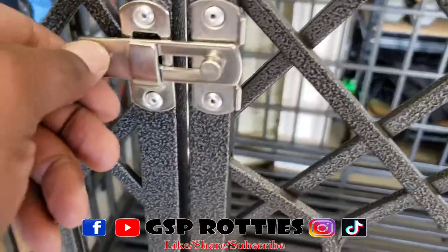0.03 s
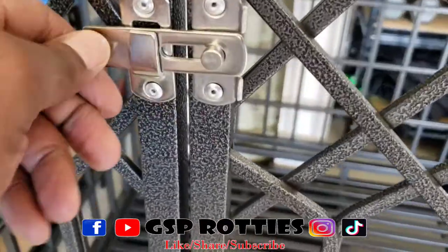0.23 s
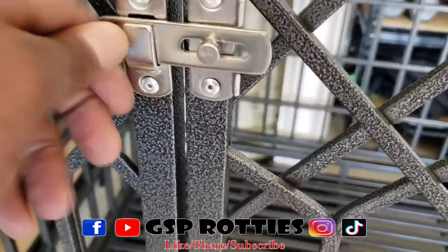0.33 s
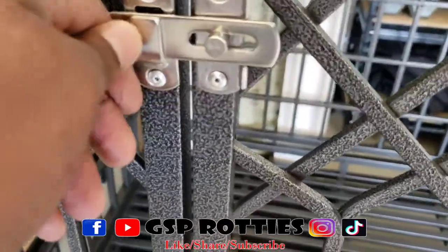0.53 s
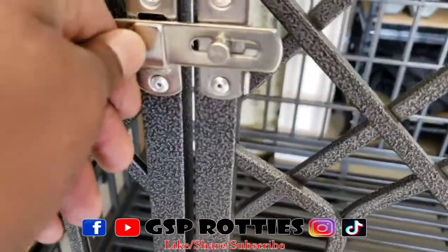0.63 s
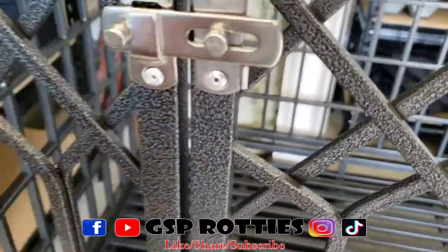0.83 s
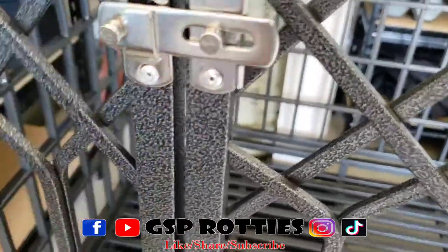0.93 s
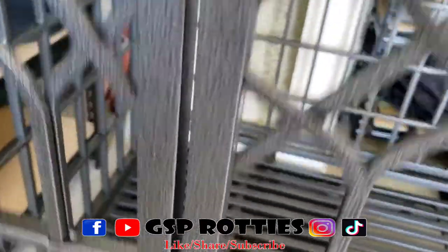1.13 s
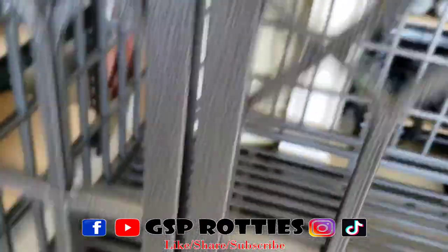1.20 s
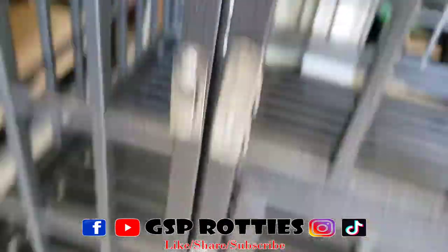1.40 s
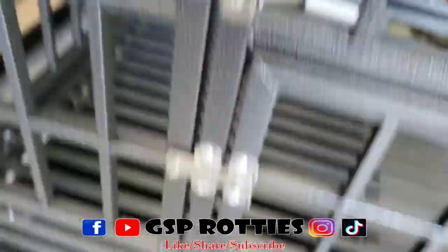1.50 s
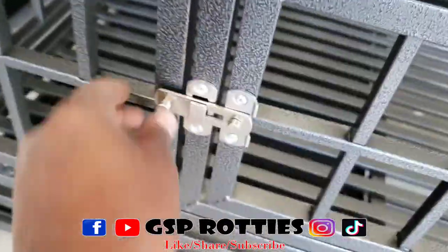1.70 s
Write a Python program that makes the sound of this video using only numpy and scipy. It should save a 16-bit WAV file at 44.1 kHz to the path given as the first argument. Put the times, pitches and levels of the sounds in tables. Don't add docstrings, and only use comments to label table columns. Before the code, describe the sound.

Close metallic clicks and a sharp clack of a steel bolt, then faint rattles of a cage door.

```python
import sys
import numpy as np
from scipy import signal
from scipy.fft import rfft, irfft, next_fast_len
from scipy.io import wavfile
from scipy.ndimage import uniform_filter1d, map_coordinates

SR = 44100
rng = np.random.default_rng(int(sys.argv[2]) if len(sys.argv) > 2 else 0)


def pcm_store(signal):
    levels = np.round(np.clip(np.atleast_2d(signal), -1, 1) * 32767)
    wavfile.write(sys.argv[1], SR, levels.astype(np.int16).T)


def rack_gain(trim_db):
    fader = np.asarray(trim_db, float)
    return 10 ** (fader / 20)


N = 77175

# f/Hz, t60/s
STEEL_T60 = [(200, 0.51), (600, 0.32), (1500, 0.17), (3000, 0.34), (5500, 0.13), (8500, 0.17), (12000, .08),
             (15500, 0.25)]
# f/Hz, likeness/-1..1
STEEL_ALIKE = [(300, 0.7), (700, 0.5), (1400, -0.7), (3000, -0), (7000, 0.2)]
# f/Hz, level/dB
PORTS = [(200, 0), (700, -0.85), (1300, -5), (4500, -1), (8000, 1), (12000, 3.5), (14700, 5.5)]
# f/Hz, level/dB
GARAGE_PORTS = [(200, -1.5), (700, 0.5), (2400, -5), (4400, -2), (8000, 2), (12000, -0.5), (15000, -0.5)]
# f/Hz, likeness/-1..1
AIR_ALIKE = [(60, 0.8), (180, 0.75), (550, 0.58), (1650, 0.053), (4970, -0.21), (15000, -0.4)]
FAR_PAN_DB = -2
LOW_CUT_HZ = 240


def unit(x):
    return x / np.sqrt(np.mean(x ** 2) + 1e-20)


def along(points, hz):
    f, v = np.transpose(points)
    return np.interp(np.log(hz + 1), np.log(f + 1), v)


def curve(rows):
    return np.interp(np.arange(N) / SR, *np.transpose(rows))


def filtered(x, response):
    m = next_fast_len(x.shape[-1] + 8192)
    spectrum = rfft(x, m) * response(np.fft.rfftfreq(m, 1 / SR))
    return irfft(spectrum, m)[..., :x.shape[-1]]


def sides(db):
    return rack_gain(np.array([db / 2, -db / 2]))


def wobble(rate):
    knots = rng.standard_normal(int(N * rate / SR) + 4)
    return map_coordinates(knots, [np.arange(N) * rate / SR])


def rush(spectrum, alike, ports):
    def mid_side(hz):
        turn = np.arccos(np.clip(along(alike, hz), -1, 1)) / 2
        return rack_gain(along(spectrum, hz)) * [np.cos(turn), np.sin(turn)]

    mid, side = filtered(rng.standard_normal((2, N)), mid_side)
    left_right = np.array([mid + side, mid - side])
    return unit(filtered(left_right, lambda hz: sides(along(ports, hz))))


def background():
    # f/Hz, level/dB
    air_spectrum = [(150, -27), (220, -4.5), (600, -8.5), (750, -3), (1100, -15), (4300, -16), (8600, -22),
                    (14000, -22)]
    # f/Hz, level/dB
    rumble_spectrum = [(12, -44), (20, -17.5), (77, -2.5), (93, -3), (108, -13.5), (250, -31.5),
                       (320, -59.5), (550, -120)]
    # f/Hz, level/dB
    air_ports = [(60, -1), (240, -0.9), (950, -0.5), (3770, -6), (15000, 4)]
    # t/s, level/dB
    grip = [(0.0, -50), (0.034, -63), (0.072, -69), (0.262, -57), (0.36, -67.5), (0.428, -58.5),
            (0.526, -69.5), (0.574, -61.5), (0.744, -74), (0.814, -62.5), (0.852, -70), (1.168, -66),
            (1.252, -73), (1.344, -63.5), (1.374, -73), (1.5, -61), (1.524, -66), (1.75, -66)]
    # t/s, level/dB
    shake = [(0, -3), (.6, 0.5), (.75, -14), (1.75, -23)]
    upper_spectrum = [(80, -26.0), (140, -2.0), (260, -21.5), (500, -62.5)]  # f/Hz, level/dB
    rumble = rush(rumble_spectrum, [(50, .8)], air_ports)
    rumble += rack_gain(curve(shake)) * rush(upper_spectrum, [(50, 0.99)], air_ports)
    held = rack_gain(curve(grip) + 0.53 * wobble(7.3)) * rumble
    air = rack_gain(-75 + 0.58 * wobble(4)) * rush(air_spectrum, AIR_ALIKE, air_ports)
    return held + air


def shelves(hz, treble_db, bass_db):
    treble_hz, bass_hz = 8600, 1940
    treble = treble_db / (1 + (treble_hz / (hz + 1)) ** 4)
    bass = bass_db / (1 + (hz / bass_hz) ** 4)
    return rack_gain(treble + bass)


def contacts(blows, slides):
    count, soft_s = 10, .004
    grit_db, grit_sum_db = 5, -22
    hz = np.transpose(STEEL_T60)[0]
    out = np.zeros((len(hz), N + SR))
    for s, db, treble_db, bass_db, chatter in blows:
        u, size = rng.random(count), rng.standard_normal(count)
        train = np.bincount((2 * u * chatter * SR).astype(int), size * (1 - u) * 0.41)
        train[0] = np.clip(soft_s / chatter, .5, 1)
        push = np.outer(shelves(hz, treble_db, bass_db), train)
        out[:, round(s * SR):][:, :len(train)] += rack_gain(db) * push
    for s, end, first_db, last_db, treble_db in slides:
        grit = unit(rng.standard_normal(4000) * rack_gain(grit_db * rng.exponential(size=4000)))
        n = int(np.clip((end - s) * SR, 9, 4000))
        grains = grit[:n] * rack_gain(np.linspace(first_db, last_db, n) + grit_sum_db)
        out[:, round(s * SR):][:, :n] += np.outer(shelves(hz, treble_db, 0), grains)
    return out[:, :N]


def dying(pushes, noise, decays, rise_s):
    hz, t60 = np.transpose(decays)
    lag = np.exp(-1 / (rise_s * SR))
    out = np.zeros((2, N))
    for k, push in enumerate(pushes):
        keep = 10 ** (-6 / (t60[k] * SR))
        stored = signal.lfilter([1], [1, -keep], push ** 2)
        energy = signal.lfilter([1 - lag], [1, -lag], stored)
        share = list(zip(hz, np.arange(len(hz)) == k))
        out += np.sqrt(energy) * filtered(noise, lambda f: along(share, f))
    return out


def uneven(x):
    mode_db, mode_hz = 3, 46.51
    knots = rng.standard_normal(2000)
    return filtered(x, lambda hz: rack_gain(mode_db * map_coordinates(knots, [hz / mode_hz])))


def clear_modes(pushes):
    # f/Hz, level/dB, t60/s
    bolt_modes = [(253.5, -23, 0.49), (345, -18, 0.27), (628.6, -12.5, 0.067), (942, -14.5, 0.16),
                  (1701, -5.5, 0.092), (2100, -7, 0.0807), (3232, -3.5, 0.15), (4948, -8.5, 0.35),
                  (5165, 12.5, 0.015), (5520, -1, .11), (6530, -7, 0.071), (7400, 4.5, 0.034),
                  (12100, -4.5, .06)]
    # f/Hz, level/dB, t60/s
    shrill = [(14650, -8, .07)]
    bolt_db, low_mode_hz = -10, 400
    bands = np.log(np.transpose(STEEL_T60)[0])
    out = np.zeros((2, N))
    for hz, db, t60 in bolt_modes + shrill:
        push = pushes[np.argmin(abs(bands - np.log(hz)))]
        pole = 10 ** (-3 / (t60 * SR)) * np.exp(2j * np.pi * hz / SR)
        lead = np.arccos(np.clip(along(STEEL_ALIKE, hz), -1, 1))
        turn = np.exp(1j * np.array([0, lead]))
        if hz < low_mode_hz:
            energy = signal.lfilter([1], [1, -abs(pole) ** 2], push ** 2)
            size = uniform_filter1d(np.sqrt(energy), size=200)
            ring = size * np.exp(2j * np.pi * hz * np.arange(N) / SR)
        else:
            ring = signal.lfilter([1], [1, -pole], push)
        out += rack_gain(db + bolt_db) * np.outer(turn * sides(along(PORTS, hz)), ring).imag
    return out


def steel_sound(pushes, colour, ports, crack_db, wet_db):
    # f/Hz, t60/s
    garage_t60 = [(200, 0.82), (600, 0.61), (1500, 0.44), (3000, 0.43), (5500, 0.36), (8500, 0.31),
                  (12000, 0.27), (15500, 0.26)]
    # f/Hz, level/dB
    garage_colour = [(200, 9), (1500, 3), (4200, 1), (6000, -1), (8000, -6.5), (12000, -4), (14600, -8.5)]
    crack_t60 = [(hz, 0.0088) for hz, _ in STEEL_T60]
    hard = pushes * (abs(pushes) / abs(pushes).max()) ** 0.3
    walls = [(hz, db + along(garage_colour, hz)) for hz, db in colour]
    crack = dying(hard, rush(colour, STEEL_ALIKE, ports), crack_t60, .00005)
    ringing_noise = unit(uneven(rush(colour, STEEL_ALIKE, ports)))
    ringing = dying(pushes, ringing_noise, STEEL_T60, .0005)
    garage_noise = unit(uneven(rush(walls, AIR_ALIKE, GARAGE_PORTS)))
    garage = dying(pushes, garage_noise, garage_t60, .02)
    x = rack_gain(crack_db) * crack + ringing + rack_gain(wet_db) * garage
    return signal.sosfilt(signal.butter(3, LOW_CUT_HZ, "high", fs=SR, output="sos"), x)


def bolt():
    # t/s, level/dB, treble/dB, bass/dB, chatter/s
    blows = [(.0082, -30.5, 1.5, -8.5, 0.003), (.012, -30.5, -12, -2.5, 0.0022),
             (.020, -32, -21, 0.5, 0.0052), (.026, -28.5, -10, 0, 0.0054), (.0385, -31.5, 5.5, -1, 0.0041),
             (.043, -34, -3, 0, 0.0037), (.1645, -49.5, -4.5, 0, .002), (.167, -36.5, -17.5, -4, 0.0025),
             (.1705, -39.5, -12.5, -3.5, 0.00093), (.1755, -36, 3.5, 5.5, 0.001),
             (.191, -40, -10, -4, .002), (.1964, -28, 1, -2, 0.0015), (.1975, -22, 0, 2.5, .0012),
             (.2003, -25.5, -4.5, 0, 0.0018), (.2035, -25.5, -8, -3.5, 0.0012),
             (.216, -31, -11, -1.5, 0.0022), (.3825, -29.5, 2, -3.5, 0.003),
             (.3875, -25.5, 1, -3.5, 0.0024), (.391, -27, -3.5, -5.5, 0.0017),
             (.3985, -14, 5, -11, 0.00052), (.3996, -14, 2.5, -8, 0.00051), (.4014, -13, 4, -3, 0.0012),
             (.4038, -17.5, 2, 0, 0.0016), (.409, -20.5, -3, -4, 0.0028), (.418, -22, 0, -2, 0.0032),
             (.5378, -35, -11, -17, 0.0012), (.5391, -28.5, 5.5, -15, 0.0017),
             (.5412, -28, -11, -6, 0.0018), (.546, -30.5, -10, -2, .003), (.552, -30.5, -8, 3, 0.0037)]
    # start t/s, end t/s, first level/dB, last level/dB, treble/dB
    slides = [
        (.0042, .008, -39.5, -30, 18),
        (.008, 0.063, -40, -42, -18),
        (0.1742, 0.188, -44, -41.5, 0),
        (0.352, 0.38, -55.5, -45, -8.5),
        (0.376, 0.398, -27.5, -26, 2),
    ]
    # f/Hz, level/dB
    steel = [(230, -31), (600, -16.5), (2000, -7), (3600, -7), (5300, -2), (8300, -6), (12000, -9.5),
             (14700, -7.5)]
    pushes = contacts(blows, slides)
    dense = steel_sound(pushes, steel, PORTS, crack_db=10, wet_db=-13)
    clear = filtered(clear_modes(pushes), lambda hz: 1 / (1 + (LOW_CUT_HZ / 2 / (hz + 1)) ** 4))
    return rack_gain(-6.5) * (dense + clear)


def rattles():
    # t/s, level/dB, treble/dB, bass/dB, chatter/s
    knocks = [(.742, -36.5, -7, -23, 0.0094), (.758, -48, 5.5, 12.5, 0.0063), (.832, -39.5, -8, -13, 0.003),
              (.838, -42.5, -5, 3, 0.0086), (.986, -47, -5, -12, 0.003), (.991, -46, -7, -1.5, 0.0076),
              (1.013, -52.5, 12, 9, 0.01), (1.04, -53, -10, -4.5, 0.0041), (1.062, -62, -4, -5, .004),
              (1.082, -57.5, -4, -10, .006), (1.583, -64, 6.5, -6, 0.003), (1.61, -78, 16, 0, .002),
              (1.66, -68, 5.5, 2, 0.003), (1.665, -70.5, 22.5, -0.5, 0.0018),
              (1.682, -73.5, 20.5, 1.5, 0.003)]
    # start t/s, end t/s, first level/dB, last level/dB, treble/dB
    rubs = [
        (0.788, .83, -65, -65, 15),
        (0.858, .975, -62, -69.5, 9.5),
        (1.5, 1.597, -81, -74.5, 7),
        (1.608, 1.678, -81, -63.5, -0.5),
        (1.688, 1.74, -72, -82, 9),
    ]
    # f/Hz, level/dB
    far_steel = [(200, -22), (500, -12.5), (1100, -6.5), (2500, -6.5), (4300, -1), (6000, -2),
                 (8500, -13.5), (15000, -19)]
    ports = [(hz, db + FAR_PAN_DB) for hz, db in GARAGE_PORTS]
    return rack_gain(-10.5) * steel_sound(contacts(knocks, rubs), far_steel, ports, crack_db=-5, wet_db=-8)


def tick():
    # t/s, level/dB, f/Hz, t60/s
    clicks = [(1.6602, -55.5, 2300, 0.0089), (1.6605, -59, 4150, 0.0048), (1.6699, -62.5, 5200, 0.014),
              (1.6745, -47, 2110, 0.015), (1.6753, -60.5, 5490, 0.01), (1.661, -57, 5800, .003),
              (1.6665, -62, 13490, .003), (1.681, -63, 12000, .003), (1.687, -65, 14500, .003),
              (1.019, -63.5, 2720, 0.053), (1.064, -69, 4260, .03), (1.081, -69, 4270, 0.039)]
    # delay t/s, level/dB
    echoes = [
        (.006, -18),
        (.011, -14),
        (.021, -17),
        (.033, -27),
    ]
    x, t = np.zeros(N + SR), np.arange(SR // 10) / SR
    for s, db, hz, t60 in clicks:
        onset = 1 - np.exp(-t / 0.0003)
        x[round(s * SR):][:len(t)] += rack_gain(db - 60 * t / t60) * np.sin(2 * np.pi * hz * t) * onset
    direct = x[:N]
    walls = sum(rack_gain(db) * np.roll(direct, round(s * SR)) for s, db in echoes)
    return direct * sides(-17.5)[:, None] + walls * sides(FAR_PAN_DB)[:, None]


def scene():
    return bolt() + rattles() + tick() + background()


def band_limit(x):
    return signal.sosfilt(signal.butter(12, 16630, fs=SR, output="sos"), x)


def record(dry):
    # f/Hz, level/dB
    mic_left = [(3300, -2.5), (4300, -4), (6400, 1), (7600, -3.5), (9200, -5), (12000, 2), (14600, 1.5),
                (16000, -8.5)]
    # f/Hz, level/dB
    mic_right = [(3300, -2.5), (4250, 1.5), (6200, 1.5), (7200, -4), (9200, -2.5), (11800, 4), (13500, -6),
                 (16000, -4.5)]
    top_hz = 15900

    def ports(hz):
        colour = rack_gain([along(mic_left, hz), along(mic_right, hz)])
        return colour / (1 + (hz / top_hz) ** 240)

    return band_limit(filtered(dry, ports))


dry = scene()
out = record(dry)
pcm_store(out)
```